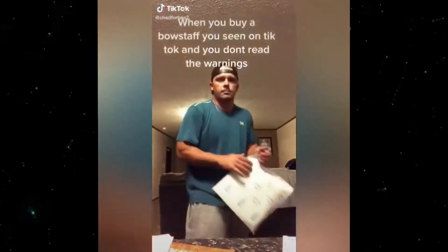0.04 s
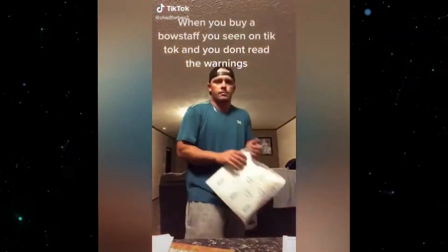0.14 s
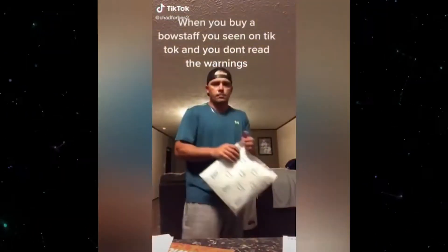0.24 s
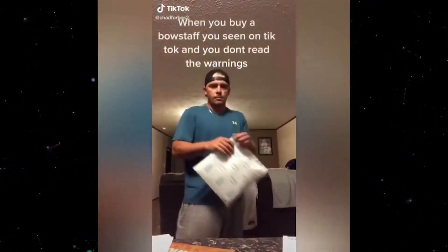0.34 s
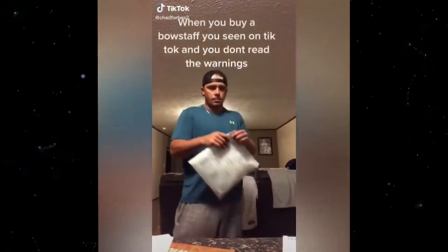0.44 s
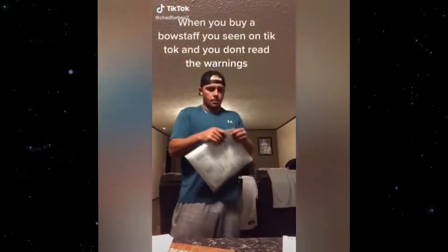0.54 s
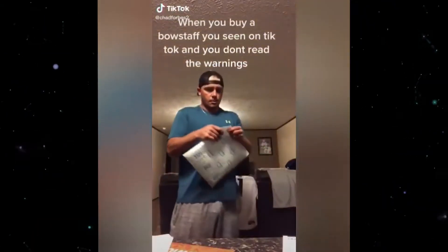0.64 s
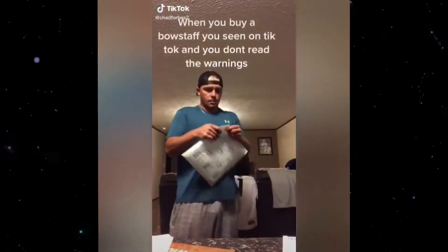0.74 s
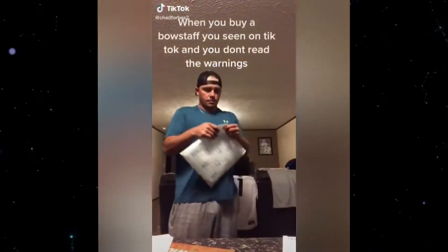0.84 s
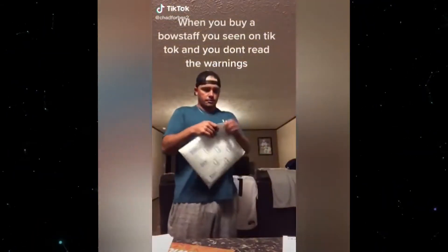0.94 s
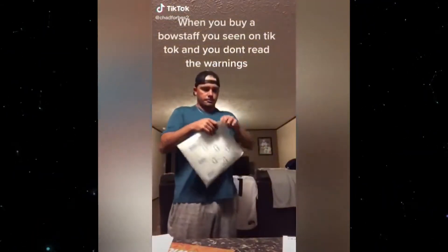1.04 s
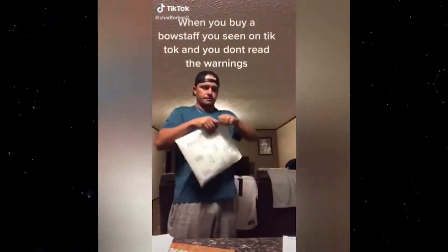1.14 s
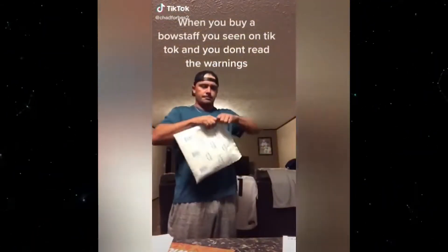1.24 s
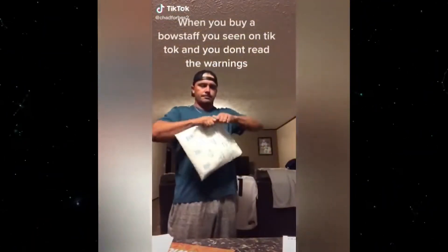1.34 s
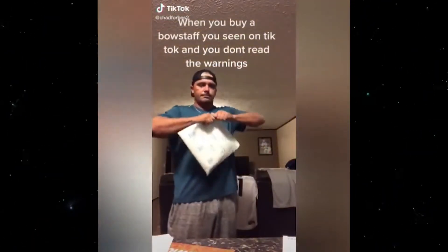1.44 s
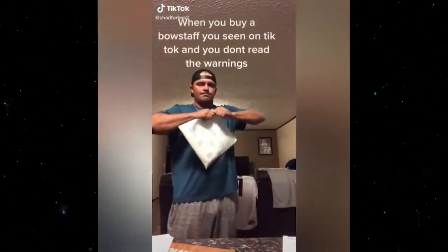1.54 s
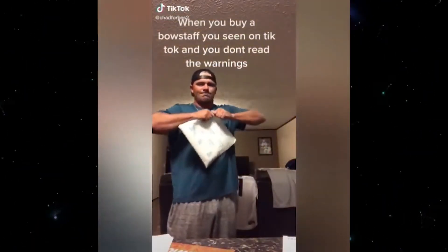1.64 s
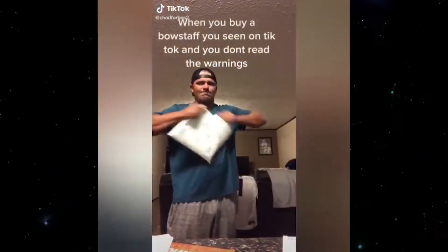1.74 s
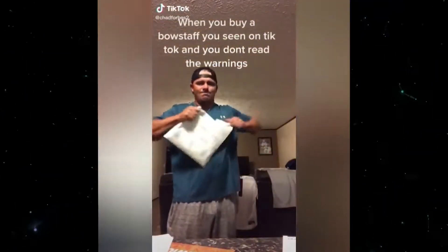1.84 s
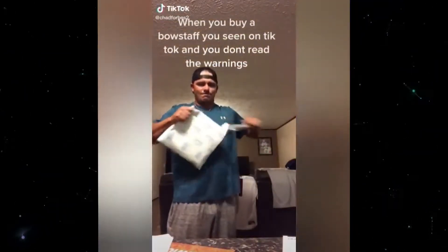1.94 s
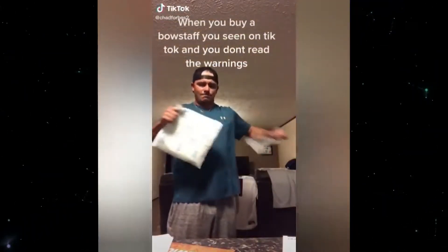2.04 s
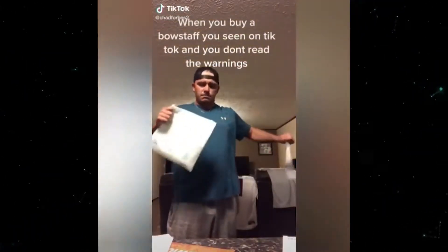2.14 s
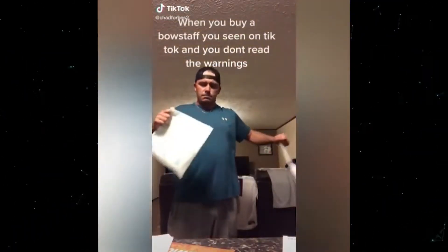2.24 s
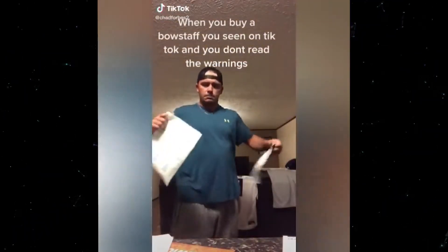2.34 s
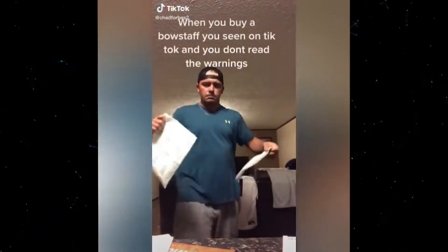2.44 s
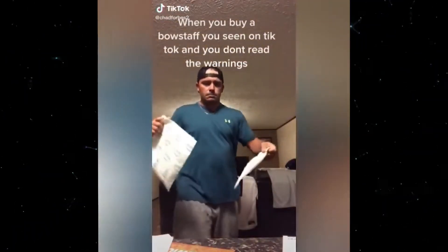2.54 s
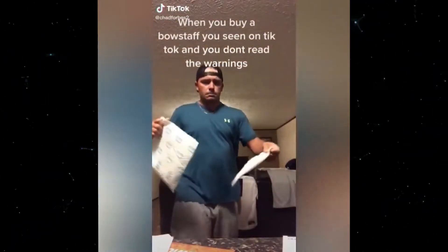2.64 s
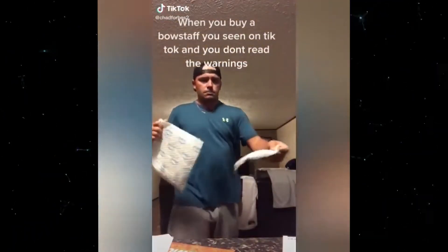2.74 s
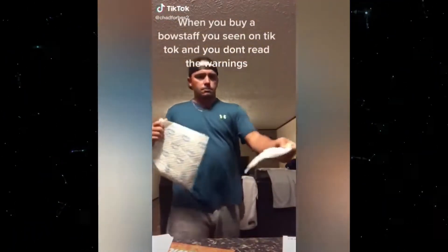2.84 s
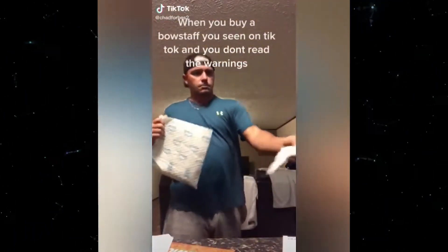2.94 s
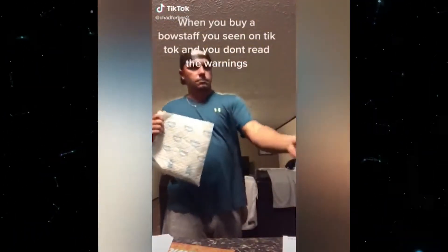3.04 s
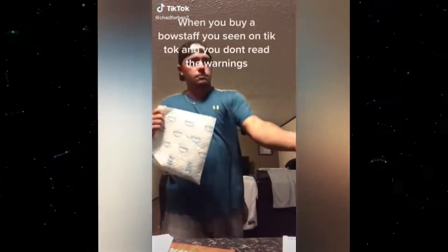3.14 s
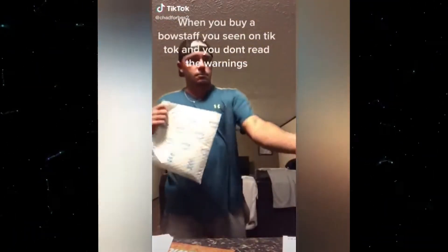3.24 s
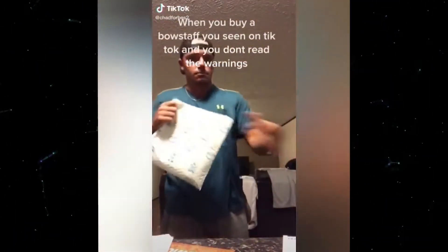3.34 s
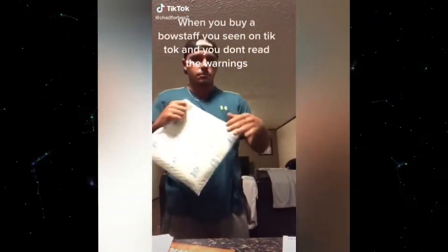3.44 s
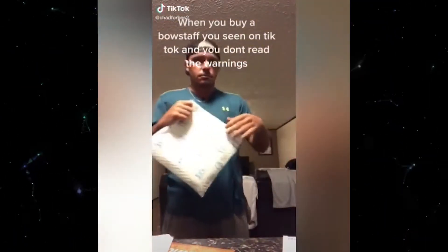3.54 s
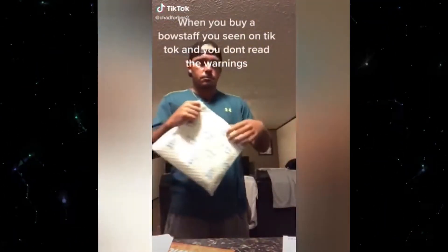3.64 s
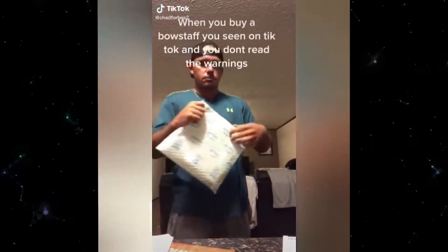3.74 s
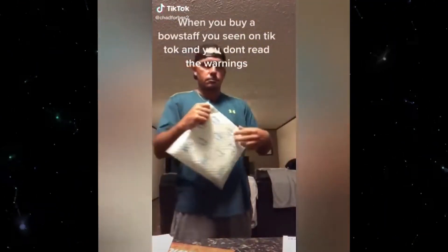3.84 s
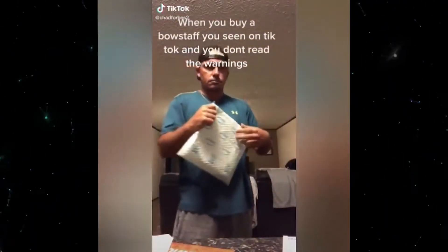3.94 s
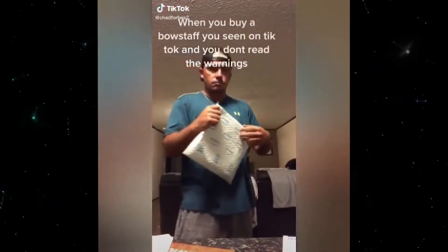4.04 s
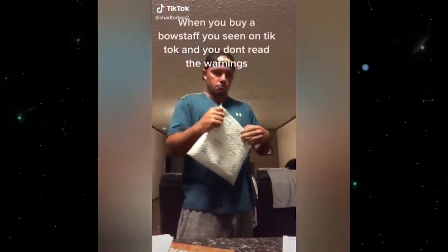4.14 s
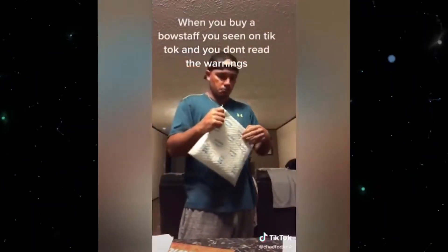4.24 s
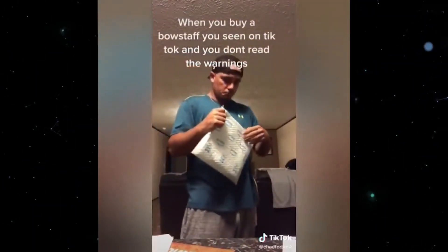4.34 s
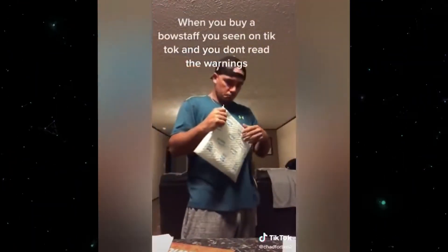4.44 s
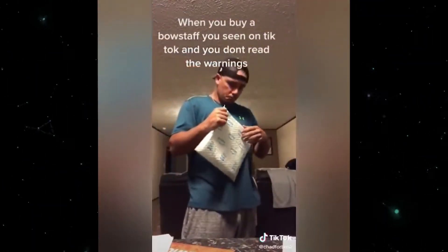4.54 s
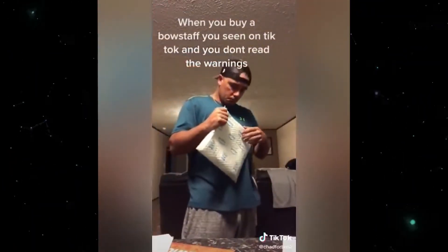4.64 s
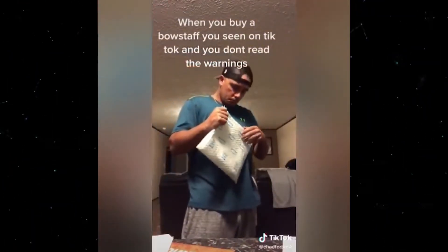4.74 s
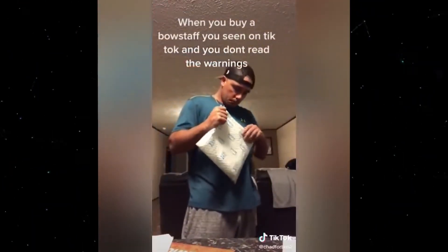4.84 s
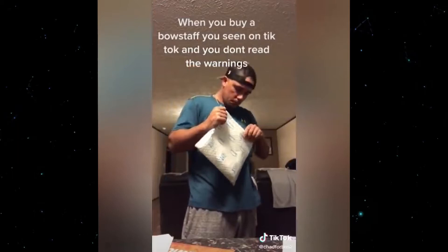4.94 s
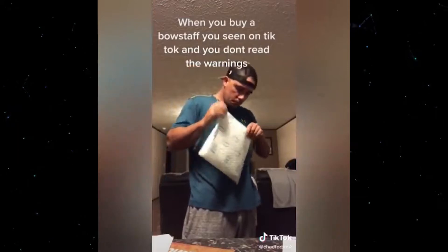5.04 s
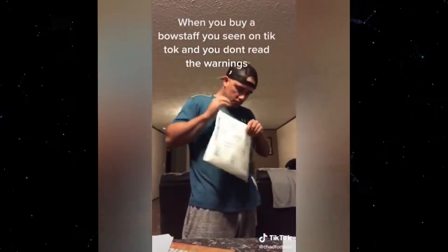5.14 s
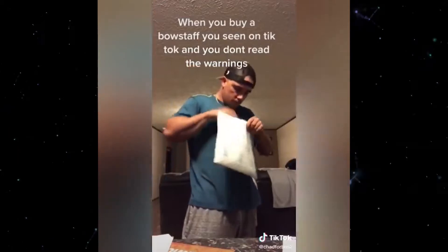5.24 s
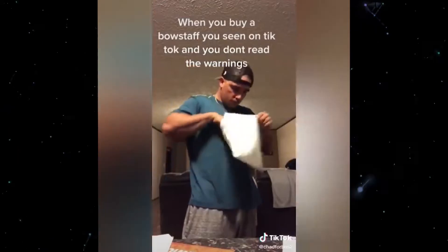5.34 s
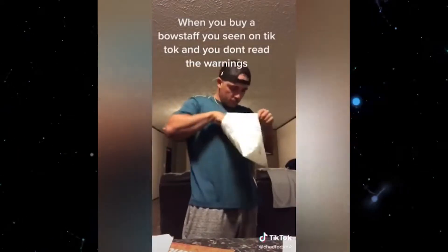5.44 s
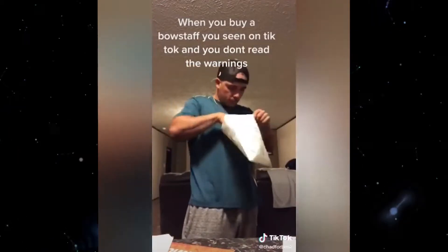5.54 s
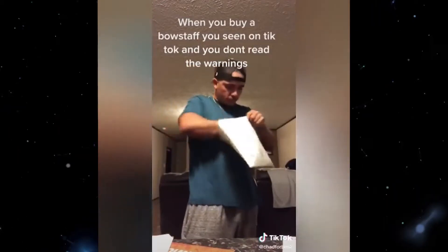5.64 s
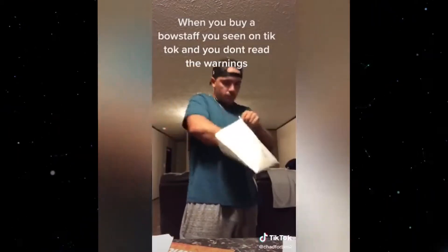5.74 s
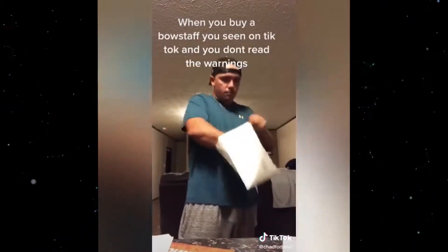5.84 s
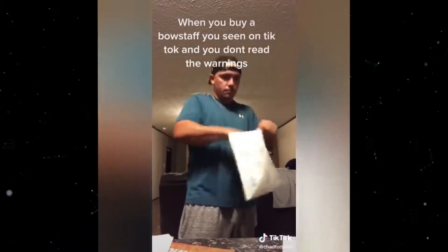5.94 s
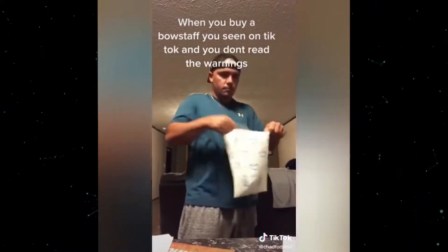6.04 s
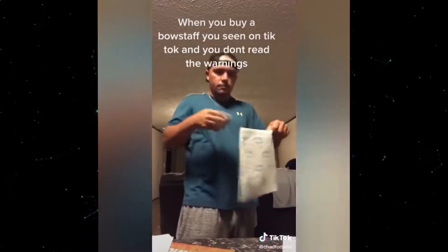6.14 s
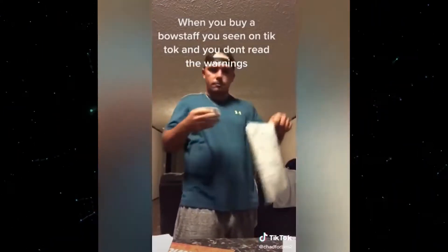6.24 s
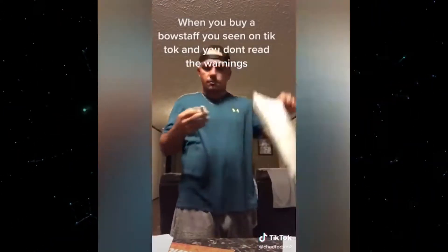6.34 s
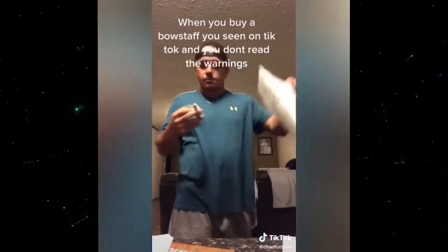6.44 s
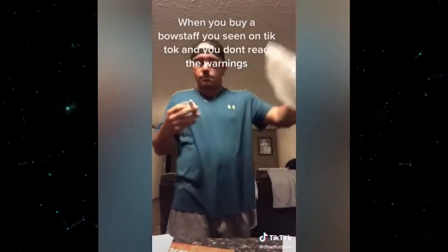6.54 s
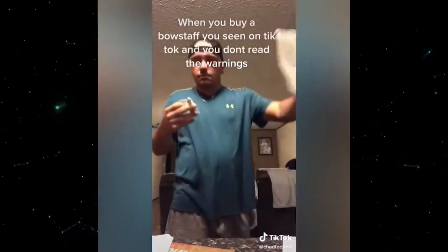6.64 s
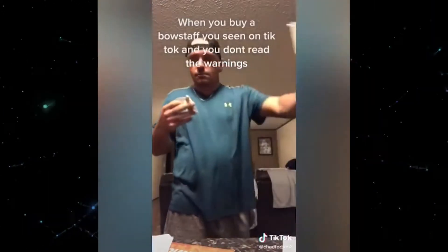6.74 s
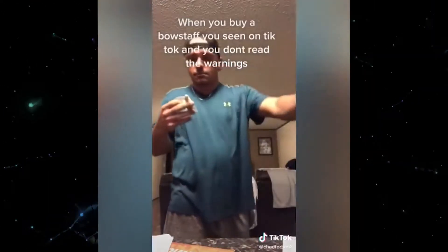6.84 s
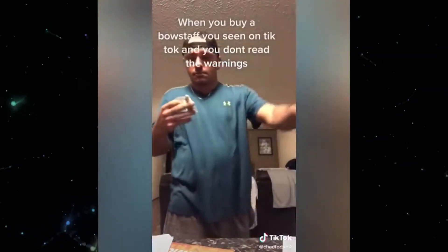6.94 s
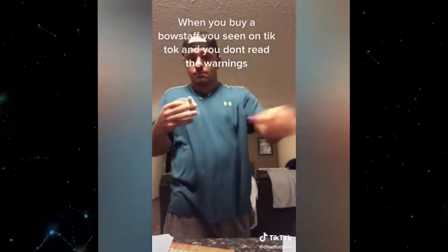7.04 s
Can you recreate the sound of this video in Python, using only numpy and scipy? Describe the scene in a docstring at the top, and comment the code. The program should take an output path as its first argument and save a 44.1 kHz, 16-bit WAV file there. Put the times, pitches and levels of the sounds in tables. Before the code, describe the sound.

A padded paper mailer crinkles in a living room, rips open in two quick loud pulls, then is rustled through and tossed aside with a soft thump.

```python
"""A padded paper mailer is handled, torn open in two pulls, searched and thrown aside in a furnished living room.
Creases snap one by one as short noise bursts with a ring, over a rustle of small buckles: clumped, filtered clicks.
The tear is a dense run of breaking fibres; jerks, steps and the landing push low noise; echo delays add the room.
A faint room hiss and a low appliance hum of two tones lie below; one microphone feeds both channels."""
import sys
import numpy as np
from scipy import signal
from scipy.fft import rfft, irfft, next_fast_len
from scipy.io import wavfile

SR = 44100
rng = np.random.default_rng(int(sys.argv[2]) if len(sys.argv) > 2 else 0)


def materialize(psi):
    """Save the field psi as 16-bit PCM at rate SR to the path in sys.argv[1].

    A 1-D psi becomes a single channel; in a 2-D psi each row is a channel.
    """
    bounded = np.clip(np.atleast_2d(psi).T, -1, 1)
    quanta = np.round(bounded * 32767).astype(np.int16)
    wavfile.write(sys.argv[1], SR, quanta)


def rack_gain(trim_db):
    """Turn a fader trim in dB into the linear factor to multiply a signal by."""
    fader = np.asarray(trim_db, float)
    return 10 ** (fader / 20)


N = 313110


def rms_one(x):
    """Scale to unit rms."""
    return x / np.sqrt(np.mean(x ** 2) + 1e-20)


def in_time(rows, outside=None):
    """Table columns joined by straight lines, one value a sample."""
    s, *columns = np.transpose(rows)
    t = np.arange(N) / SR
    return np.array([np.interp(t, s, column, outside, outside) for column in columns])


def at_hz(points, hz):
    """Spectrum level in dB, interpolated over log frequency."""
    point_hz, point_db = np.array(points).T
    return np.interp(np.log(hz), np.log(point_hz), point_db)


def coloured(x, spectrum):
    """Each row of x shaped by a spectrum."""
    size = x.shape[-1]
    hz = np.maximum(np.arange(size // 2 + 1) * SR / size, 1)
    return irfft(rfft(x) * rack_gain(at_hz(spectrum, hz)), size)


def band(x, low_hz, high_hz):
    """Butterworth band-pass."""
    sos = signal.butter(2, [low_hz, high_hz], "band", fs=SR, output="sos")
    return signal.sosfilt(sos, x)


def wander(spread_db, corner_hz, size=N):
    """A slowly wandering gain: coarse noise through a double one-pole low-pass, read as dB."""
    step = 32  # samples per coarse point
    pole = np.exp(-2 * np.pi * corner_hz * step / SR)
    noise = rng.standard_normal(N // step + 3002)
    slow = signal.lfilter([1], [1, -2 * pole, pole ** 2], noise)[3000:]  # start-up dropped
    return np.interp(np.arange(size) / step, np.arange(len(slow)), rack_gain(spread_db * rms_one(slow)))


# single creases: (time [s], reference level [dB], ring [Hz], panels re reference [dB], fibres re reference [dB])
SNAPS = [(0.0795, -39, 3320, -22, -20), (0.1147, -36.5, 2200, -26, -22), (0.1277, -45, 2010, -11, -16),
         (0.1711, -33, 1850, -14, -5), (0.1709, -31, 1580, -21, -11), (0.2733, -36, 2210, -11, -12),
         (0.3292, -35.5, 2080, -25, -21), (0.3741, -30.5, 1930, -10, -16), (0.42, -41, 4450, -16, -20),
         (0.4434, -31, 1480, -12, -10), (0.4551, -26.5, 4600, -14, -10), (0.5013, -26, 2100, -23, -12),
         (0.5316, -33, 1530, -12, -11), (0.5597, -30.5, 1550, -18, -22), (0.5893, -34, 1300, -12, -21),
         (0.619, -35, 1610, -16, -11), (0.6776, -45, 1370, -20, -14), (0.729, -30, 1950, -32, -5),
         (0.7676, -44, 2000, -20, -15), (0.7883, -37, 4260, -16, -7), (0.7997, -25, 1690, -17, -9),
         (0.8565, -38, 2150, -22, -11), (0.8974, -37, 4300, -19, -26), (0.9393, -35.5, 1640, -17, -31),
         (0.9423, -29, 1870, -24, -43), (1.0386, -59, 1060, -6, -22), (1.0575, -39, 1560, -15, -18),
         (1.1107, -32.5, 4030, -17, -7), (1.1334, -37, 1070, -13, -22), (1.1513, -29, 3870, -14, -15),
         (1.2215, -35, 4220, -5.5, -13), (1.2349, -28, 4300, -17, -13), (1.2702, -23, 3920, -16, -23),
         (1.303, -20, 3830, -31, -19), (1.3308, -30, 1320, -19, 0.5), (1.3614, -20.5, 1470, -17, -17),
         (1.4881, -19, 4270, -14.5, -18), (1.5474, -33, 3570, -21, -8), (1.5968, -27, 3670, -18, -17),
         (1.6478, -33, 4150, -16, -13), (1.6712, -25, 3720, -14, -12), (1.6843, -14, 1310, -14, -32),
         (1.7041, -14.5, 3880, -10, -14), (1.8662, -21.5, 1350, -11, -15), (1.8946, -18, 895, -17, -17),
         (1.9795, -8.5, 1005, -12, -15), (2.2705, -37.5, 4030, -21, -23), (2.3601, -44, 1280, -17, -28),
         (2.4035, -37, 3610, -32, -40), (2.4545, -40, 1430, -16, -23), (2.5402, -31.5, 3530, -21, -28),
         (2.5571, -32, 1120, -17, -32), (2.598, -39, 4100, -10, -20), (2.633, -52, 4900, -13, 1),
         (2.697, -30.5, 3780, -25, -8), (2.7652, -37.5, 3650, -17, -16), (2.8757, -43, 4520, -18, -2),
         (2.8805, -32.5, 1660, -13.5, -14), (2.9146, -33.5, 3770, -15, -13), (2.9738, -44, 5500, -17, -14),
         (3.0909, -37, 4000, -31, -25), (3.1411, -41, 1290, -16, -12), (3.162, -41, 1810, -15, -27),
         (3.1722, -38.5, 1430, -18, -25), (3.2062, -37.5, 3220, -28, -27), (3.2276, -42, 4290, -27, -7),
         (3.2461, -31.5, 1570, -41, -12), (3.2755, -39, 1270, -23, -14), (3.3199, -27.5, 1337, -8.5, -20),
         (3.3318, -23, 1800, -21, -8), (3.3573, -45, 1500, -11, -11), (3.3768, -25, 2230, -16, -9.5),
         (3.4716, -43.5, 1070, -23, -24), (3.516, -44.5, 1130, -11, -8), (3.5459, -36, 3390, -15, -21),
         (3.5788, -40, 1050, -25, -26), (3.6135, -48.5, 1210, -7, -18), (3.6372, -33, 3380, -24, -31),
         (3.6877, -44, 4500, -20, -8), (3.7219, -32, 4400, -21, -10.5), (3.7511, -32, 1030, -22, -21),
         (3.8023, -41, 1880, -23, -6), (3.8256, -41, 2890, -12, -12), (3.8642, -39.5, 1360, -13, -23),
         (3.949, -52, 1380, -19, -12), (3.9608, -30.5, 3240, -14, -10), (4.0153, -37, 4330, -8, -14),
         (4.0956, -34, 3240, -20, -13), (4.204, -47.5, 1070, -5, -20), (4.2287, -37, 3340, -15, -11),
         (4.261, -32.5, 4130, -23, -10), (4.261, -32.5, 1860, -11, -12), (4.382, -39, 5350, -21, -12),
         (4.383, -32.5, 3740, -23, -23), (4.4079, -32, 1710, -25, -27), (4.5032, -37.5, 1060, -21, -11),
         (4.584, -44, 3830, -21, -20), (4.608, -46, 2250, -17, -6), (4.6196, -40.5, 1270, -19, -7),
         (4.6467, -39.5, 4300, -24, -4), (4.722, -36, 1490, -18, -16), (4.7367, -39, 1550, -15, -13),
         (4.7921, -32, 1940, -29, -8.5), (4.8297, -36.5, 4030, -31, -5), (4.8584, -37, 2640, -22, -12),
         (4.8988, -27, 1350, -17, -15), (4.9103, -22.5, 1380, -21, -19), (4.9884, -30.5, 4060, -20, -9),
         (5.0108, -38, 1080, -20, -3), (5.0363, -28, 2050, -15, -11), (5.0579, -23, 2300, -24, -11.5),
         (5.1318, -33, 1110, -14, -8.5), (5.1507, -33, 1000, -15, -13), (5.1742, -32, 1100, -11, -7),
         (5.209, -36, 1270, -19, -7), (5.232, -26, 4480, -18, -7.5), (5.2822, -40, 3700, -8, -12),
         (5.2993, -30.5, 1020, -19, -9), (5.3523, -27, 1270, -20, -6), (5.4916, -42, 1320, -9, -2),
         (5.5202, -33.5, 1540, -21, -12), (5.5454, -33, 4150, -18, -11), (5.5997, -33, 4450, -18, -6.5),
         (5.6249, -33.5, 4710, -26, -3.5), (5.667, -32.5, 3500, -12, -18), (5.8542, -23.5, 2410, -20, -26),
         (5.9464, -25.5, 930, -7, -20), (6.0787, -29, 980, -22, -8), (6.1375, -27.5, 1840, -23, -26),
         (6.3525, -39.5, 2700, -24, -11), (6.371, -40.5, 3900, -24, -23), (6.4836, -38, 3020, -26, -17),
         (6.5077, -40, 2030, -27, -21), (6.5351, -34, 2400, -21, -21), (6.558, -34, 3220, -32, -24),
         (6.5805, -34, 2280, -28, -20), (6.6187, -39.5, 2000, -22, -18), (6.6927, -42, 2670, -15, -27),
         (6.7062, -30, 1940, -36, -37), (6.7516, -36, 2780, -28, -17), (6.7608, -34, 2070, -16, -13),
         (6.7922, -36, 1830, -9, -11), (6.8221, -33.5, 1800, -19, -19), (6.8524, -29, 2000, -17, -19),
         (6.8884, -43, 2200, -17, -8), (6.904, -36.5, 5400, -24, -4.5), (6.9508, -42, 5620, -13, -9),
         (6.9668, -31, 870, -11.5, -15), (6.9863, -30, 3190, -17, -11), (7.0234, -33.5, 1070, -7, -21)]
# paper colour: (frequency [Hz], level [dB per Hz])
PAPER = [(150, -33), (250, -11), (440, -3), (750, -4.5), (1100, -1), (1700, -2.5), (2500, -2), (3400, -0.5),
         (4300, 0), (5100, -6), (7800, -9), (10200, -17), (12500, -16.5), (15000, -19), (16000, -34)]
# zone edges, panels | creases | fibres: (frequency [Hz])
ZONE_HZ = [400, 2000, 6000, 15000]
# crack decay in panels, creases, fibres: (T60 [s])
SNAP_T60_S = [0.0057, 0.012, 0.0058]
RING_DB, CREASE_DB = -7.5, -12.5  # re reference level
RING_CYCLES = 18  # cycles to -60 dB
CRACK_S = 0.0014  # window in which the zone levels hold as rms
SNAP_TAIL, SNAP_TAIL_T60_S = 0.034, 0.013
BUZZ_DB, BUZZ_T60_S, BUZZ_WIDTH = -12, 0.027, 0.13  # re reference level; width as a share of the pitch


def snaps():
    """Each crease gives a dying burst in three zones of the sheet, with a few cycles of its own pitch."""
    s, level_db, hz, panel_db, fibre_db = np.transpose(SNAPS)[:, :, None]
    zones_db = level_db + [panel_db, 0 * hz + CREASE_DB, fibre_db]
    t = np.arange(1536) / SR
    noise = coloured(rng.standard_normal((len(s), len(t))), PAPER)
    phase = 2 * np.pi * hz * t

    ring_env = rack_gain(level_db + RING_DB - 60 * t * hz / RING_CYCLES)
    onset = np.minimum(t * hz / 2.2, 1)  # full after 2.2 cycles
    sounds = ring_env * onset * np.sin(phase)

    # the freed flap keeps its pitch only roughly
    flutter = np.cumsum(rng.standard_normal(noise.shape), axis=1) * np.sqrt(2 * np.pi * BUZZ_WIDTH * hz / SR)
    sounds += rack_gain(level_db + BUZZ_DB - 60 * t / BUZZ_T60_S) * np.sin(phase + flutter)

    shiver = SNAP_TAIL * rack_gain(-60 * t / SNAP_TAIL_T60_S)
    for low, high, zone_db, t60 in zip(ZONE_HZ, ZONE_HZ[1:], zones_db, SNAP_T60_S):
        part = band(noise * (rack_gain(-60 * t / t60) + shiver), low, high)
        crack_rms = np.sqrt(np.mean(part[:, t < CRACK_S] ** 2, axis=1, keepdims=True))
        sounds += rack_gain(zone_db) * part / crack_rms

    out = np.zeros(N + len(t))
    np.add.at(out, np.round(s * SR).astype(int) + np.arange(len(t)), sounds)
    return out[:N]


SETTLE_S = 0.0083  # time constant of the click energy


def crackle(zones_db, spectrum, per_s, spread_db, clump_db, colour_db, patchy_db, smear):
    """Clumped clicks, nominally per_s a second; each shakes every half-octave of the sheet by its own strength."""
    size = zones_db.shape[1]
    born = np.flatnonzero(rng.random(size) < per_s * wander(clump_db, 30.0, size) / SR)
    excess = np.minimum(rng.exponential(1, size), 3.5)
    sizes = rack_gain(spread_db * excess) * rng.choice([-1, 1], size) / np.sqrt(per_s)

    # the sheet shivers on after a click
    energy = np.zeros(size)
    energy[born] = sizes[born] ** 2
    settling = signal.lfilter([1], [1, -np.exp(-1 / (SETTLE_S * SR))], energy + 1e-18)
    sliding = np.sqrt(1.3 + settling / settling.mean()) * rng.standard_normal(size)

    strengths = rng.standard_normal(size)
    edges_hz = 177 * 2 ** np.arange(0, 6.6, 0.5)
    zones = np.zeros((3, size))
    for k, (low, high) in enumerate(zip(edges_hz, edges_hz[1:])):
        clicks = np.zeros(size)
        clicks[born] = sizes[born] * rack_gain(colour_db * strengths[born - 7 * k])
        patch = wander(patchy_db, 22.0, size)  # the free panels change size as the bag bends
        shaken = band(patch * (rms_one(clicks) + smear * sliding), low, high)
        zone = int(low >= ZONE_HZ[1]) + int(low > 0.9 * ZONE_HZ[2])
        zones[zone] += (-1) ** k * shaken  # alternate signs: neighbours join without a gap
    zones = [rms_one(z) for z in coloured(zones, spectrum)]
    return np.sum(rack_gain(zones_db) * zones, axis=0)


def zone_levels(level_db, dull_db, fibres_db, dulled):
    """Panel, crease and fibre levels: panels gain the dullness, fibres lose a share (dulled) of it."""
    return np.array([level_db + dull_db, level_db, level_db + fibres_db - dulled * dull_db])


# how hard the hands work the bag: (time [s], rustle level [dB], dullness [dB])
HANDS = [(0, -48.5, 2.5), (.04, -61.5, -6), (.152, -61, 4.5), (.172, -46, -2), (.36, -61.5, 1),
         (.41, -60, 0.5), (.452, -47.5, -2), (.63, -59.5, -3), (.68, -61.5, -4), (1.04, -65, 3.5),
         (1.06, -54.5, 2), (1.16, -55, -2), (1.37, -43.5, 0), (1.58, -53.5, -1.5), (1.675, -49.5, -4),
         (2.08, -50, -2), (2.3, -62.5, -1.5), (2.68, -66, -3.5), (3.0, -72.5, -5), (3.17, -71, 4),
         (3.3, -63, -8), (3.38, -71, 0), (3.53, -81, -1), (3.73, -59, -2), (3.94, -70.5, 6),
         (3.966, -57.5, 2.5), (4.2, -72.5, -1), (4.256, -58, 4.5), (4.36, -84, 0), (4.39, -59, -5.5),
         (4.5, -81.5, 1), (4.65, -57.5, -2.5), (4.7, -73.5, -4), (4.73, -59.5, -3.5), (4.89, -54.5, -1),
         (5.07, -48, -1.5), (5.124, -54.5, 1), (5.172, -48.5, -3.5), (5.27, -61, 0), (5.3, -46.5, -2.5),
         (5.358, -42, 1.5), (5.414, -57.5, 0), (5.66, -56.5, -1.5), (5.68, -46, -2.5), (5.74, -42, 2.5),
         (5.9, -47, 3), (6.04, -52, 2.5), (6.15, -51, 4), (6.27, -63.5, 1), (6.32, -84, -1.5),
         (6.586, -68, -3), (6.67, -71, 1), (6.704, -56, -5), (6.8, -59, -2), (6.88, -63.5, 5.5),
         (6.94, -72, -6), (6.97, -53, 0.5), (7.1, -48.5, 3.5)]
FIBRES_DB, FIBRES_DULLED = -2.5, 0.1  # re creases; share of dullness
AFTERMATH_DB, AFTERMATH_T60_S = -22.5, 0.076  # rustle that a snap shakes loose, re its reference level
STRAIN_DB, STRAIN_T60_S = -29, 0.025  # creak growing before the crease gives, re the same


def rustle():
    """Small buckles under the hands and around each snap; the harder the handling, the denser they come."""
    hands_db, dull_db = in_time(HANDS)
    s, snap_db = np.transpose(SNAPS)[:2]
    kicks = np.zeros(N)
    np.add.at(kicks, (s * SR).astype(int), rack_gain(snap_db) ** 2)

    def power_tail(x, gain_db, t60_s):
        """Exponentially decaying power after each kick."""
        return signal.lfilter([rack_gain(2 * gain_db)], [1, -rack_gain(-120 / (t60_s * SR))], x + 1e-18)

    after = power_tail(kicks, AFTERMATH_DB, AFTERMATH_T60_S)
    before = power_tail(kicks[::-1], STRAIN_DB, STRAIN_T60_S)[::-1]
    level_db = 10 * np.log10(rack_gain(hands_db) ** 2 + before + after)
    per_s = 600.0 * rack_gain(0.8 * np.clip(level_db + 57, -6, 18))
    zones_db = zone_levels(level_db, dull_db, FIBRES_DB, FIBRES_DULLED)
    return crackle(zones_db, PAPER, per_s, spread_db=5.0, clump_db=3.5, colour_db=3.0, patchy_db=3.0, smear=0.61)


# the two pulls: (time [s], level [dB], dullness [dB])
TEAR = [(1.68, -50, -1), (1.685, -32, 0.5), (1.76, -26.5, 5.5), (1.788, -37.5, 1.5), (1.85, -49, 0),
        (1.865, -41.5, 9), (1.895, -35, 6.5), (1.965, -32.5, 6.5), (1.982, -31, 4.5), (2.0, -30, 8.5),
        (2.018, -39, 0.5), (2.06, -50, -7)]
# tear colour: (frequency [Hz], level [dB per Hz])
RIP = [(88, -35), (150, -11), (186, -11.5), (291, -16), (504, -1.5), (790, -4), (1020, 0.5), (1560, -5),
       (2400, -14), (3490, -9.5), (5910, -14.5), (7320, -5), (10000, -17), (14800, -14), (16000, -36)]
TORN_FIBRES_DB, TORN_FIBRES_DULLED = -4.5, 0.47  # re creases; share of dullness


def tear():
    """Fibres break so fast that they nearly fuse into a hiss."""
    level_db, dull_db = in_time(TEAR, outside=-120)
    pulling = level_db > -119
    zones_db = zone_levels(level_db, dull_db, TORN_FIBRES_DB, TORN_FIBRES_DULLED)[:, pulling]
    out = np.zeros(N)
    out[pulling] = crackle(zones_db, RIP, per_s=2300.0, spread_db=1.5, clump_db=3.5, colour_db=4.5,
                           patchy_db=2.35, smear=0.79)
    return out


# jerks of the bag, steps, landing: (peak time [s], time for the 14 dB rise [s], deep level [dB], upper level [dB])
THUMPS = [(.27, 0.062, -55, -58.5), (.79, 0.046, -55, -70), (1.35, 0.22, -60, -60),
          (1.77, 0.069, -41.5, -39.5), (2.01, .14, -41.5, -39.5), (2.8, 0.073, -61, -54.5),
          (3.34, 0.053, -51, -52.5), (3.8, 0.074, -59, -69), (4.25, .06, -60, -72), (5.1, 0.059, -57, -58),
          (5.35, .07, -52, -54), (5.75, 0.071, -44, -45), (6.01, 0.066, -48.5, -58),
          (6.13, 0.099, -51, -49.5), (6.44, 0.057, -55.5, -66), (6.62, 0.056, -53.5, -59.5),
          (6.971, 0.0096, -48, -45.5), (6.995, 0.021, -54, -47), (7.04, 0.016, -34.5, -38),
          (7.075, 0.022, -47, -40)]
# thump colour: (frequency [Hz], level [dB per Hz])
PUSH = [(18, -47), (30, -20), (91, 0), (160, -6.5), (220, -14.5), (265, -9.5), (350, -12.5), (460, -48),
        (770, -120)]
# low stir between thumps, rows deep and upper: (level [dB])
RUMBLE_DB = [
    [-65.5],
    [-70.5],
]
RUMBLE_WANDER_DB, RUMBLE_CORNER_HZ = 2.5, 8.0
THUMP_RISE_DB, THUMP_FALL_DB_PER_S = 14, 174
PUSH_SPLIT_HZ = 128


def thumps():
    """Pushed air as lumpy low noise, deep and upper; each push swells and dies over a wandering stir."""
    t = np.arange(0, N, 32) / SR
    s, rise_s, *parts_db = np.transpose(THUMPS)[:, :, None]
    shape_db = np.where(t < s, THUMP_RISE_DB / rise_s, -THUMP_FALL_DB_PER_S) * (t - s)
    pushes = [np.interp(np.arange(N) / SR, t, rack_gain(db + shape_db).max(axis=0)) for db in parts_db]
    stir = rack_gain(RUMBLE_DB) * [wander(RUMBLE_WANDER_DB, RUMBLE_CORNER_HZ) for _ in pushes]
    deep, upper = np.hypot(pushes, stir)
    air = coloured(rng.standard_normal(N), PUSH) * wander(0.29, 5.9)
    deep_air = rms_one(band(air, 44.0, PUSH_SPLIT_HZ))
    upper_air = rms_one(band(air, PUSH_SPLIT_HZ, 241.0))
    return deep * deep_air + upper * upper_air


ROOM_T60_S, WALL_CUT_HZ = 0.56, 12700  # T60 at the lowest frequencies


def room(x):
    """Echo: ten feedback delays, duller every round, then two short diffusers, on a frequency grid."""
    size = next_fast_len(N + SR)
    turn = np.exp(-2j * np.pi * np.arange(size // 2 + 1) / size)  # one-sample delay
    dull = np.exp(-2 * np.pi * WALL_CUT_HZ / SR)
    wall = (1 - dull) / (1 - dull * turn)
    response = 0
    for k, lag in enumerate(rng.uniform(0.011, 0.04, 10) * SR):
        loop = rack_gain(-60 * lag / SR / ROOM_T60_S) * wall * turn ** int(lag)
        response = response + (-1) ** k * loop / (1 - loop)
    for lag in rng.uniform(0.001, 0.005, 2) * SR:
        delay = turn ** int(lag)
        response = response * (delay - 0.6) / (1 - 0.41 * delay)
    return irfft(rfft(x, size) * response, size)[:N]


# appliance hum: (time [s], frequency [Hz], rms level [dB])
HUM = [(0, 97, -65.5), (.6, 97, -64), (1.2, 96, -64), (1.7, 96, -64), (2.2, 94, -65), (3.0, 93, -70),
       (3.3, 93, -87), (4.4, 93, -82)]
# its lower tone: (time [s], frequency [Hz], rms level [dB])
DRONE = [(0, 43.2, -68), (1.0, 39.3, -76), (2.2, 37.9, -76), (3.4, 38.1, -66), (4.4, 39, -85)]


def hum(rows):
    """A low sine that wavers a little and fades out between 4.2 and 4.6 s."""
    hz, level_db = in_time(rows)
    fade = np.clip((4.6 - np.arange(N) / SR) / 0.4, 0, 1)
    tone = np.sqrt(2) * np.sin(2 * np.pi * np.cumsum(hz) / SR)
    return rack_gain(level_db) * wander(1.0, 3.3) * fade * tone


# room floor colour: (frequency [Hz], level [dB per Hz])
HISS = [(15, -23), (30, -10), (90, 0), (200, -8.5), (700, -13.5), (1100, -17.5), (2300, -20.5), (3800, -22),
        (5200, -29), (7700, -27.5), (10400, -35.5), (14500, -34), (16000, -38.5)]
HISS_DB = -64  # rms


def hiss():
    """Steady room floor: Gaussian noise shaped by a spectrum."""
    return rack_gain(HISS_DB) * rms_one(coloured(rng.standard_normal(N), HISS))


ROOM_DB = -22.5  # gain of the echo


def scene():
    """The bag with its echo in the room, thumps, hiss and hum, alike in both channels."""
    bag = rustle() + tear() + snaps()
    echo = rack_gain(ROOM_DB) * room(bag)
    mono = bag + echo + thumps() + hiss() + hum(HUM) + hum(DRONE)
    return np.array([mono, mono])


def roll_off(x):
    """The treble ends steeply here."""
    return signal.sosfilt(signal.butter(12, 16690, fs=SR, output="sos"), x)


def record(dry):
    """The finished mix as stored."""
    return roll_off(dry)


dry = scene()
out = record(dry)
materialize(out)
```